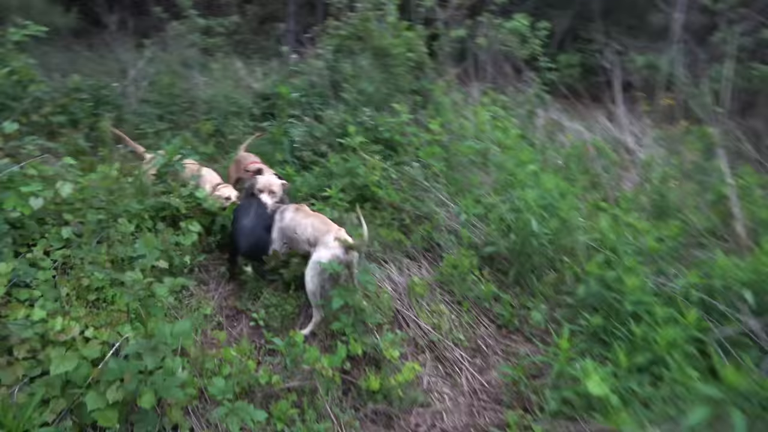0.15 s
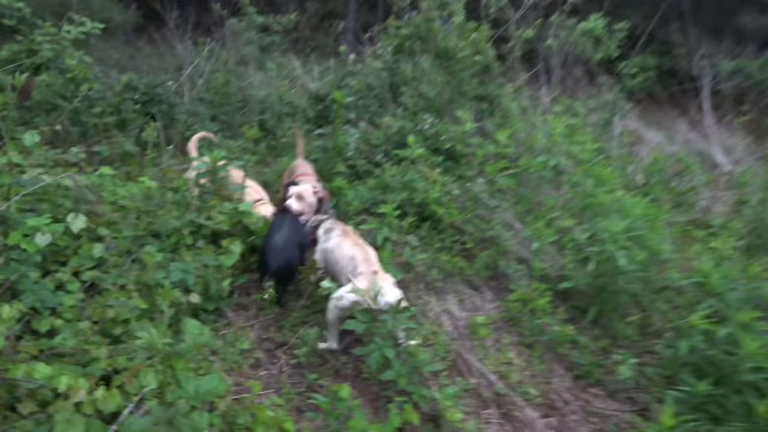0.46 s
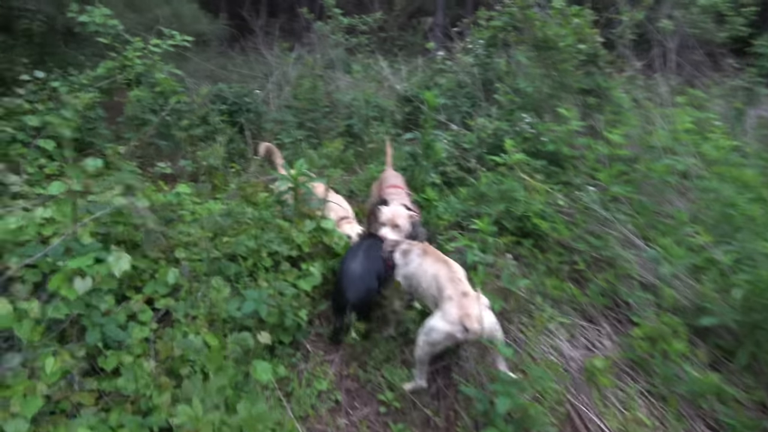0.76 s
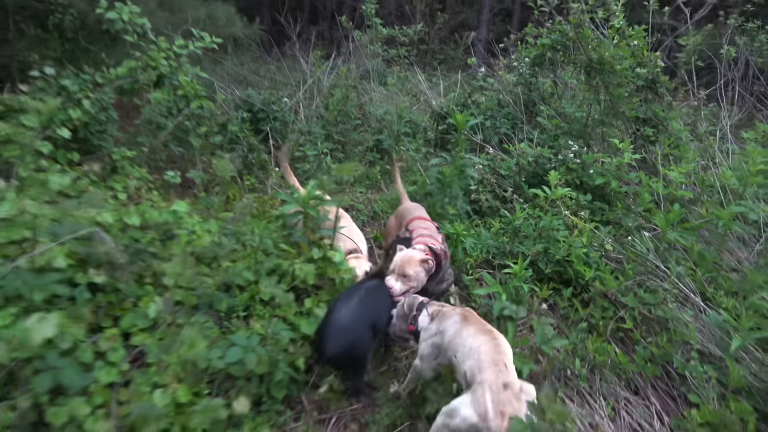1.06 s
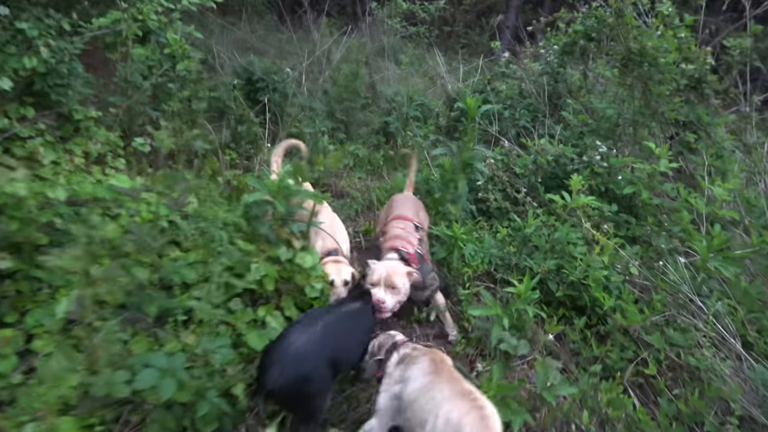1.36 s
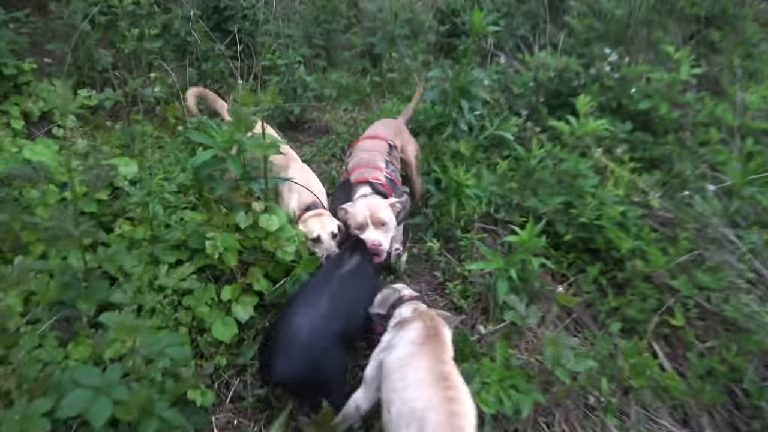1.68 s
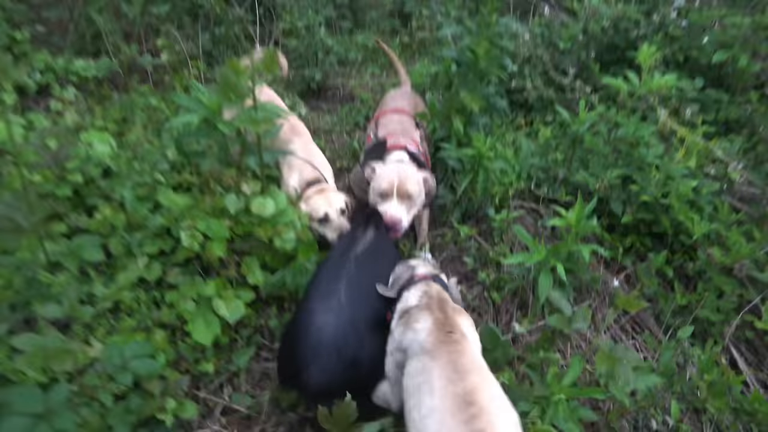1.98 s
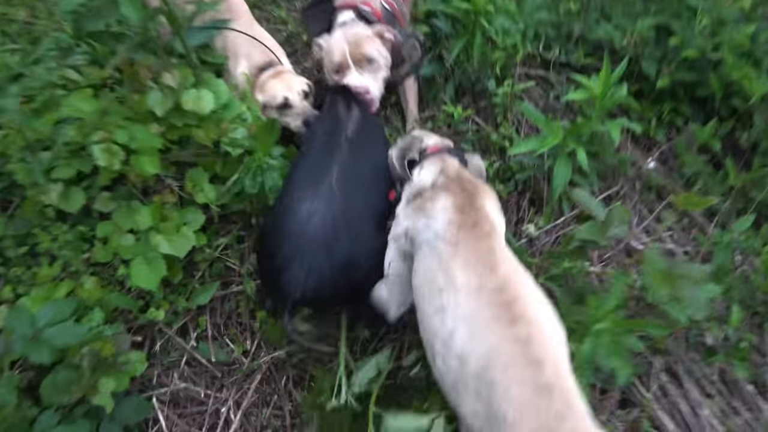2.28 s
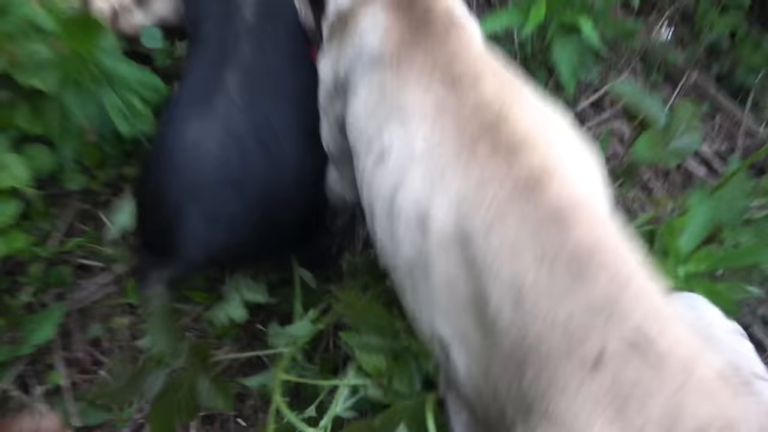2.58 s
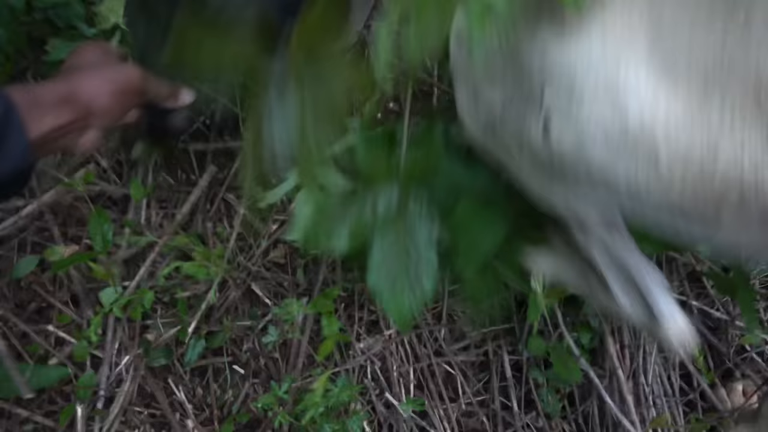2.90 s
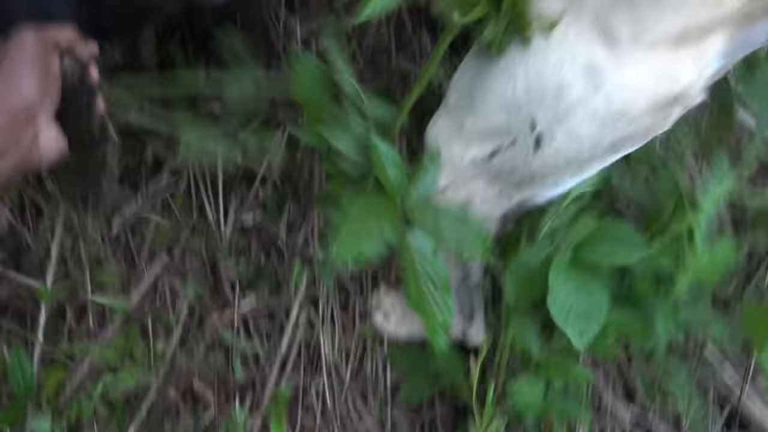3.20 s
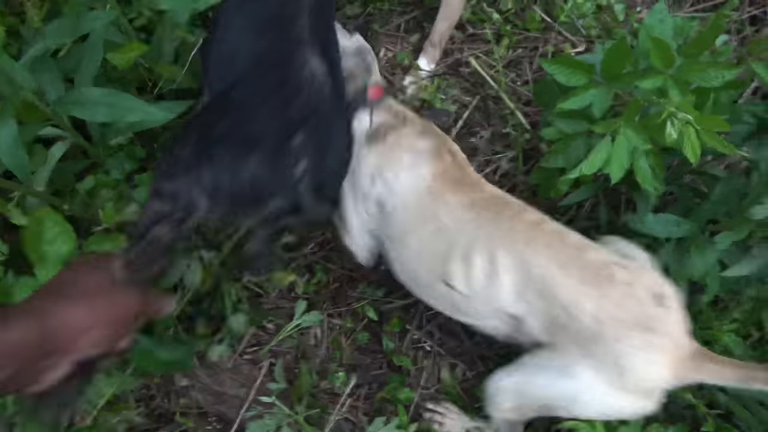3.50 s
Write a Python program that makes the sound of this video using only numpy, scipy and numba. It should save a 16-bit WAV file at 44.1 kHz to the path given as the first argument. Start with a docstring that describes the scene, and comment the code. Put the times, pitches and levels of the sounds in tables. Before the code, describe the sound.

A wild hog squeals close to the microphone, first a hoarse whistling cry, then shorter creaking cries, finally a rasping squeal; leaves rustle, feet thud and twigs snap in thick outdoor brush.

```python
"""Thick brush, a caught wild hog near the microphone: leaves rustle and feet thud throughout.
It opens on a hoarse whistling cry; one dull knock comes early, then creaks and whistles as twigs snap.
Shorter cries follow, creaking into hoarse breath, with sharper snaps and a second dull knock.
Near the end the brush thrashes loudest, a metal tag rings once and the voice tears into a rasping squeal.
Noise and pulses through moving resonances make the voice, sines its tones; the wood adds a faint tail."""
import sys
import numpy as np
from scipy import signal
from scipy.io import wavfile
from scipy.ndimage import uniform_filter1d
from numba import njit

SR = 44100
rng = np.random.default_rng(int(sys.argv[2]) if len(sys.argv) > 2 else 0)


def transcribe(u):
    """Save the signal u as a 16-bit wav file named by the first command-line argument.

    u: samples, shape (n,) or (channels, n), limited to [-1, 1]; the rate is SR.
    q: integer samples, one column per channel.
    """
    v = np.clip(np.atleast_2d(u).T, -1, 1)
    q = np.round(v * 32767).astype(np.int16)
    wavfile.write(sys.argv[1], SR, q)


N = 160965


def undb(db):
    """Turn decibels into an amplitude factor."""
    return 10 ** (np.asarray(db) / 20)


@njit
def svf(x, hz, width):
    """State-variable band-pass with a moving centre, gain 1 at the centre."""
    y, band_state, low_state = np.empty(len(x)), 0., 0.
    for i in range(len(x)):
        g, k = np.tan(np.pi * hz[i] / SR), width / hz[i]
        v = (band_state + g * (x[i] - low_state)) / (1 + g * (g + k))
        band_state, low_state, y[i] = 2 * v - band_state, low_state + 2 * g * v, k * v
    return y


def band(x, hz, width):
    """Steep resonance, two band-passes in a row, that turns unit white noise into about rms 1."""
    hz = hz + np.zeros(N)
    once = svf(x, hz, 1. * width)
    return svf(once, hz, 1. * width) / np.sqrt(np.pi * width / SR / 2)


def walk(rate):
    """Random levels held 1 / rate s and slewed twice; spread near 1."""
    hold = int(SR / rate)
    steps = np.repeat(rng.standard_normal(N // hold + 1), hold)
    return 1.3 * uniform_filter1d(uniform_filter1d(steps, hold), hold)[:N]


def curves(tables, fade_s=0.0052):
    """Join tables into columns over time; the first result is 1 inside a table and fades outside."""
    t, rows = np.arange(N) / SR, np.vstack(tables)
    on = sum((t >= a[0][0]) & (t <= a[-1][0]) for a in tables)
    columns = [np.interp(t, rows[:, 0], c) for c in rows.T[1:]]
    return uniform_filter1d(1. * on, int(fade_s * SR)), columns


def decay(length_s, t60_s):
    """Exponential decay that falls 60 dB in t60_s."""
    return 10 ** (-3 * np.arange(int(length_s * SR)) / SR / t60_s)


def wood_tail(hog, t60_s=.7, level_db=-22):
    """The wood scatters the voice into a dense, dull tail: convolution with decaying stereo noise."""
    onset = np.minimum(np.arange(SR) / (0.0079 * SR), 1)
    tail = rng.standard_normal((2, SR)) * decay(1, t60_s) * onset
    tail = signal.lfilter([1], [1, -.6], tail)  # dulls the treble
    tail = tail / np.sqrt(np.mean(np.sum(tail ** 2, axis=1)))
    return undb(level_db) * signal.fftconvolve(hog[None], tail, axes=1)[:, :N]


# stir of the brush, relative levels, and the hog's side: start_s, rustle_db, thud_db, left_minus_right_db
BRUSH_STIR = [(0, -47, -43, 5.5), (.9, -48.5, -44, 0), (1.6, -37.5, -39, 0.5), (1.95, -45.5, -44.5, 0),
              (2.3, -43.5, -35, 0.5), (2.85, -32.5, -30, 6.5), (3.1, -32.5, -40.5, 7.5), (3.3, -42, -44, 5)]
# colour of the rustle and thuds: freq_hz, density_db (per Hz)
RUSTLE_COLOUR = [(35, -52), (60, -4), (500, -5.5), (682, -13.5), (1780, -6.5), (16000, -23)]


def brush():
    """Leaves hiss and crackle in noise bands; the bass follows the thudding of feet and bodies."""
    _, (rustle_db, thud_db, _) = curves([BRUSH_STIR])
    colour_hz, colour_db = np.array(RUSTLE_COLOUR).T
    # about 250 leaf ticks a second, each a short burst of power
    grains = (rng.random(N) < 250 / SR) * undb(3 * rng.exponential(size=N).clip(0, 3))
    bursts = signal.fftconvolve(grains ** 2, decay(.01, 0.0063))[:N].clip(0)
    grit = np.sqrt(1 + 1.8 * bursts)
    out = 0
    for hz in 45 * 2 ** np.arange(0, 8.5, .7):
        texture = grit if hz > 600 else 1
        mid, side = (band(rng.standard_normal(N) * texture, hz, hz * 1.9) for _ in range(2))
        tilt = np.interp(np.log(hz), np.log(colour_hz), colour_db) + 10 * np.log10(hz / 8000)
        db = tilt + 14 + rustle_db if hz > 400 else tilt + 12 + thud_db + 3 * walk(27)
        centre = mid * np.array([[1.2], [.85]])  # leans left
        spread = (.3 + hz / 30000) * side * np.array([[1], [-1]])  # treble is wider
        out = out + undb(db + 1.5 * walk(15)) * (centre + spread)
    return out


# dull knocks of wood: start_s, level_db (of each of two tones)
WOOD_KNOCKS = [(0.7423, -14), (2.047, -11)]


def knocks():
    """Wood knocks dully: two tones that die within milliseconds."""
    out, t = np.zeros(N + SR), np.arange(int(.2 * SR)) / SR
    tones = np.sin(2 * np.pi * 500 * t) + np.sin(2 * np.pi * 1200 * t)
    for start_s, level_db in WOOD_KNOCKS:
        i = int(start_s * SR)
        out[i:i + len(t)] += undb(level_db) * decay(.2, 0.0054) * tones
    return out[:N]


def tag(start_s=3.0165, pitch_hz=14447, level_db=-14, t60_s=.12):
    """The metal tag rings once as a single decaying sine."""
    out, t = np.zeros(N + SR), np.arange(int(.2 * SR)) / SR
    i = int(start_s * SR)
    out[i:i + len(t)] += undb(level_db) * decay(.2, t60_s) * np.sin(2 * np.pi * pitch_hz * t)
    return out[:N]


# snapping twigs: start_s, peak_db (before each is placed left or right)
TWIG_SNAPS = [(0.5939, -8.5), (0.7072, -21.5), (0.742, -9), (0.7943, -7.5), (0.9557, -9), (1.042, -8),
              (1.1185, -7.5), (1.314, -5.5), (1.7097, -5.5), (1.7369, -6), (1.7475, -14), (1.7705, -13),
              (1.79, -20), (2.0166, -3), (2.4414, 0), (2.4679, -5), (2.481, -5), (2.5075, -2),
              (2.8873, -6.5), (2.9037, -10), (2.9233, -1), (2.9622, -3)]


def twigs():
    """Each snap is a bright noise crack of its own colour and side, with a weak slower decay."""
    out = np.zeros((2, N + SR))
    env = decay(.03, 0.0098) + 0.097 * decay(.03, 0.11)
    for (start_s, peak_db), (colour, place) in zip(TWIG_SNAPS, rng.random((len(TWIG_SNAPS), 2))):
        shared = rng.standard_normal(len(env))
        crack = (shared + 0.26 * rng.standard_normal((2, len(env)))) * env
        b, a = signal.butter(2, [2500 + 2500 * colour, 15000], "band", fs=SR)
        crack = signal.lfilter(b, a, crack)
        side_gain = undb(np.array([[1], [-1]]) * (8.1 * place - 3.5))
        i = int(start_s * SR)
        out[:, i:i + len(env)] += undb(peak_db) * crack / abs(crack).max() * side_gain
    return out[:, :N]


# rasping squeal: start_s, pitch_hz, level_db (added to the colour below)
SQUEAL_LINE = [(3.12, 571, -37), (3.3, 660.6, -27.5), (3.45, 737, -27.5), (3.505, 761, -25),
               (3.515, 644.4, -25), (3.65, 669.5, -29)]
# colour of its harmonics: freq_hz, level_db
SQUEAL_TONE = [(600, -8.5), (2000, 3.5), (3000, 4), (3900, -6), (4900, 6), (7500, -1), (13000, -10)]


def squeal(halves_s=3.56, halves_db=-9):
    """A torn stack of harmonics: each swells on its own, and the higher ones smear."""
    on, (hz, level_db) = curves([SQUEAL_LINE])
    phase = 2 * np.pi * np.cumsum(hz * (1 + 0.0062 * walk(400))) / SR
    colour_hz, colour_db = np.array(SQUEAL_TONE).T
    stack = 0
    for k in range(1, 20):
        swell_db = np.interp(np.log(k * hz), np.log(colour_hz), colour_db) + 4.5 * walk(25)
        smear = .13 * k * walk(300) + .007 * k * k * walk(500)
        stack = stack + undb(swell_db) * np.sin(k * phase + smear)
    # from halves_s every second cycle differs and lines grow between the harmonics
    halves = undb(halves_db) * np.clip((np.arange(N) / SR - halves_s) * 20, 0, 1)
    return on * undb(level_db) * stack * (1 + 2 * halves * np.cos(phase / 2))


# whistles, one list each: start_s, pitch_hz, level_db (rms of the lowest tone, before flutter)
WHISTLE_LINES = [
    [(0, 1700, -12.5), (.07, 1818, -13), (.14, 1742, -10.5), (.3, 1830, -9.5), (.47, 1821, -10),
     (.5, 1735, -11.5)],
    [(.92, 1450, -18.5), (.955, 1514, -15), (.995, 1330, -30)],
    [(1.22, 1297, -23), (1.29, 1573, -16), (1.32, 1578, -29), (1.35, 1500, -12.5), (1.42, 1270, -16.5),
     (1.45, 1457, -8.5), (1.55, 1698, -16), (1.63, 1772, -16.5), (1.68, 1400, -18)],
    [(2.585, 1480, -14), (2.635, 1760, -18.5), (2.665, 1665, -15), (2.69, 1239, -25)],
]
# lowest tone and its overtones in turn: level_db
OVERTONE_LEVELS = 0, -17, -24


def whistle():
    """A hoarse, nearly pure tone: pitch trembles, level flutters, overtones come and go."""
    on, (hz, level_db) = curves(WHISTLE_LINES)
    tremble = 0.01101 * walk(300) + 0.00503 * walk(40.34)
    phase = 2 * np.pi * np.cumsum(hz * (1 + tremble)) / SR
    tone = sum(undb(db + k * 3 * walk(12)) * np.sin((k + 1) * phase + .9 * k * walk(250))
               for k, db in enumerate(OVERTONE_LEVELS))
    return on * np.sqrt(2) * undb(level_db + 1.5 * walk(250)) * tone


# creaking stretches: start_s (first pulse), end_s, start_rate_hz, end_rate_hz, pulsed_share (0-1)
CREAK_STRETCHES = [(0.8134, 0.927, 72.5, 87, 0.81), (1.019, 1.216, 79.7, 110, 0.87),
                   (1.7618, 1.9, 77, 97, 0.92), (2.221, 2.386, 66, 87, 0.82), (2.513, 2.592, 78, 90, 0.8),
                   (3.004, 3.109, 60.5, 99, 0.92)]


def creak_claps():
    """Slow fold closures: jittered clicks of random strength, and the share of sound they carry."""
    t, claps, share = np.arange(N) / SR, np.zeros(N), np.zeros(N)
    for start, end, rate0, rate1, part in CREAK_STRETCHES:
        dt = np.clip(t - start, 0, end - start)
        glide = (rate1 - rate0) * dt ** 2 / (end - start) / 2
        turn = np.floor(rate0 * dt + glide + 0.021 * walk(60) + 1)
        hit = np.diff(np.maximum.accumulate(turn * (t >= start)), prepend=0) > 0
        claps += hit * undb(1.5 * rng.standard_normal(N)) * np.sqrt(2 * SR / (rate0 + rate1))
        share += np.clip(part, 0, 1) * (t > start - .01) * (t < end)
    return claps, uniform_filter1d(share, size=500)


def folds(puff_s=.0014, puff_db=-1, beat_share=.6):
    """Vocal folds: turbulent air, broken in the creaks into claps inside short puffs."""
    claps, share = creak_claps()
    rise = np.arange(int(8 * puff_s * SR)) / (puff_s * SR)
    shape = rise * np.exp(-rise)
    puff = signal.fftconvolve(claps, shape / np.sqrt(np.sum(shape ** 2)))[:N]
    # under a whistle the folds also beat unevenly on every third cycle
    on, (hz, _) = curves(WHISTLE_LINES)
    cycles = np.cumsum(hz / 3 * (1 + .012 * walk(200))) / SR
    beats = np.diff(np.floor(cycles), prepend=0) * np.sqrt(3 * SR / hz)
    air = rng.standard_normal(N) * (1 - on * beat_share / 2) + on * beat_share * beats
    pulsed = 0.41 * claps + undb(puff_db) * puff * air
    steady = air * undb(2.0 * walk(150))
    return share * pulsed + (1 - share) * steady, share, puff


# cries, one list each: start_s, low_db, mid_db, treble_db (resonance drive; treble is later cut 3 dB)
CRY_LEVELS = [
    [(0, -26.5, -22, -22.5), (.49, -67, -23.5, -27.5), (.6, -53, -43, -75)],
    [(.79, -32, -33.5, -37), (.91, -41.5, -27, -24.5), (1.0, -39, -21.5, -23.5), (1.09, -34.5, -24, -27),
     (1.23, -38.5, -23.5, -20.5), (1.42, -35, -23.5, -26.5), (1.52, -23, -23.5, -19.5),
     (1.67, -29, -16.5, -21.5), (1.7, -32, -33.5, -44)],
    [(1.74, -21.5, -40, -44), (1.765, -20.5, -25, -18), (1.795, -21.5, -29, -34), (1.85, -21.5, -18, -19),
     (1.95, -38, -49, -72)],
    [(2.205, -22.5, -35, -75), (2.25, -19.5, -29.5, -22), (2.4, -24.5, -18, -19), (2.485, -29, -46, -39.5)],
    [(2.495, -18.5, -33, -34), (2.55, -17.5, -29.5, -18.5), (2.64, -21.5, -22.5, -19),
     (2.73, -27.5, -36, -50.5)],
    [(2.955, -18, -25.5, -46), (3.02, -24, -28, -23.5), (3.12, -38, -23.5, -19.5),
     (3.25, -46, -27.5, -26.5), (3.65, -34.5, -28, -25.5)],
]
# moving throat shape: start_s, low_hz, mid_hz, upper_hz
THROAT_SHAPE = [(0, 1082, 1620, 3200), (.85, 660, 1464, 3060), (1.0, 1170, 1547, 3400),
                (1.2, 590, 1296, 3750), (1.45, 636.7, 1460, 3220), (1.5, 1012, 1290, 3350),
                (1.75, 922, 1560, 3160), (2.2, 720, 1321, 2370), (2.335, 704, 1260, 2110),
                (2.345, 710, 2000, 2930), (2.415, 688, 2000, 2900), (2.42, 1080, 1500, 2670),
                (2.58, 816, 1356, 2540), (2.61, 1040, 1660, 3460), (2.7, 1120, 1300, 2398),
                (2.96, 827, 1459, 3200),  (3.65, 722, 1600, 3130)]
# widths of the low, middle and upper resonance: width_hz
THROAT_WIDTHS = 130, 300, 600
# fixed treble resonances, before they waver: freq_hz, width_hz, level_db
TREBLE_ROW = [(4356, 2180, 1), (5420, 600, -4), (6530, 1250, 0.5), (8530, 3100, -9), (11430, 7200, -9)]


def throat(waver_db=3.5, waver_share=.04, chest_hz=188, chest_db=-6.5):
    """The folds ring three moving resonances, the chest and wavering treble ones; creaks are duller."""
    on, (low_db, mid_db, treble_db) = curves(CRY_LEVELS)
    low_hz, mid_hz, upper_hz = curves([THROAT_SHAPE])[1]
    low_width, mid_width, upper_width = THROAT_WIDTHS
    x, share, puff = folds()
    upper_hz = upper_hz * (1 + waver_share * walk(30.08))
    treble = undb(waver_db * walk(25.01)) * band(x, upper_hz, upper_width)
    for k, (hz, width, db) in enumerate(TREBLE_ROW):
        dulling_db = 3.78 * (k + 1.5) * share
        gain = (-1) ** k * undb(db + waver_db * walk(24.99) - dulling_db)
        treble = treble + gain * band(x, hz * (1 + waver_share * walk(10)), width)
    # the chest sounds only in the creaks
    lows = band(x, low_hz, low_width) + undb(chest_db) * share * band(x, chest_hz, 230)
    mids = band(x, mid_hz, mid_width) + undb(-0.5) * band(x, mid_hz, 1590)
    # each puff also sounds the middle resonance
    mids = mids + 1.2 * share * puff * np.sin(2 * np.pi * np.cumsum(mid_hz) / SR)
    return on * (undb(low_db) * lows - undb(mid_db) * mids + undb(treble_db - 3) * treble)


def scene():
    """Place the hog left or right over time and add the wood, twigs, knocks, tag and brush."""
    pan_db = curves([BRUSH_STIR])[1][2]
    hog = throat() + whistle() + squeal()
    placed_hog = hog * undb(np.array([pan_db, -pan_db]) / 2)
    return placed_hog + wood_tail(hog) + twigs() + knocks() + tag() + brush()


def record(dry, top_hz=15800):
    """The microphone's recorder rounds the loudest peaks and cuts the top."""
    rounded = np.tanh(1.038 * dry) / 1.288
    return signal.sosfilt(signal.ellip(8, .2, 70, top_hz, fs=SR, output="sos"), rounded)


dry = scene()
out = record(dry)
transcribe(out)
```